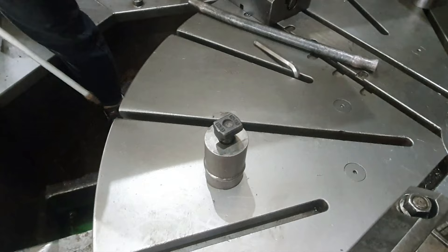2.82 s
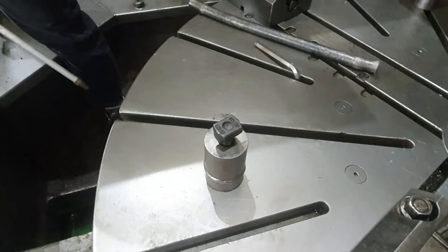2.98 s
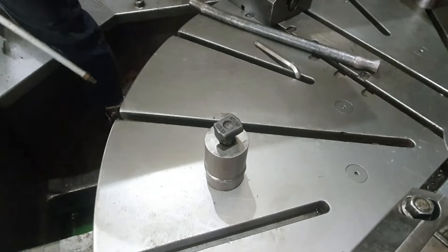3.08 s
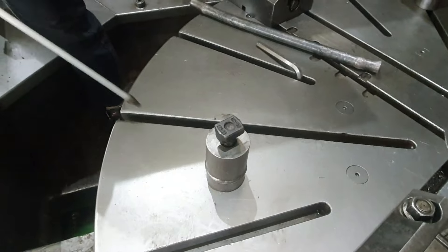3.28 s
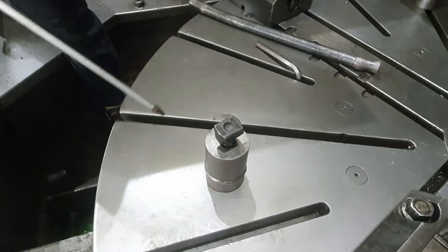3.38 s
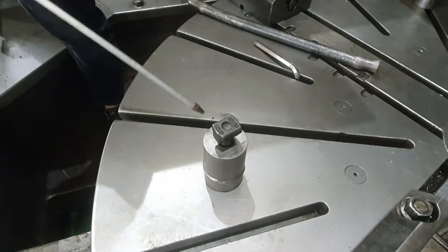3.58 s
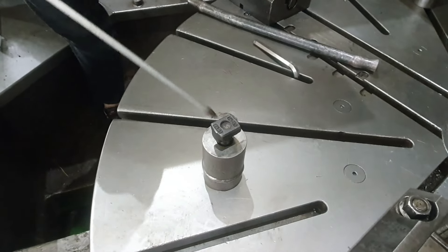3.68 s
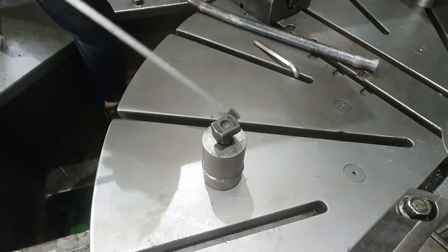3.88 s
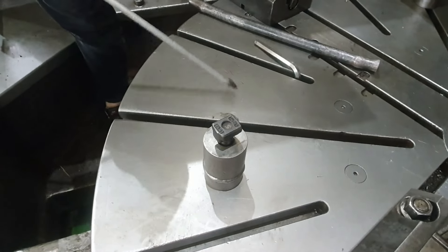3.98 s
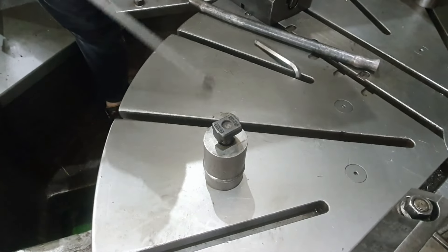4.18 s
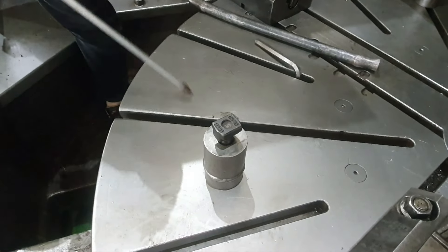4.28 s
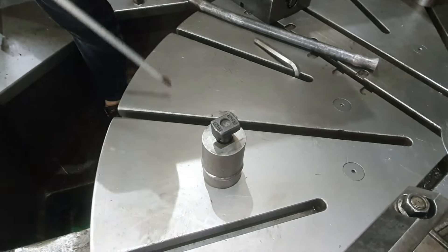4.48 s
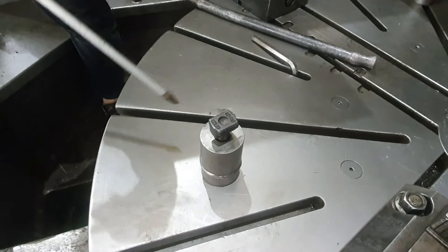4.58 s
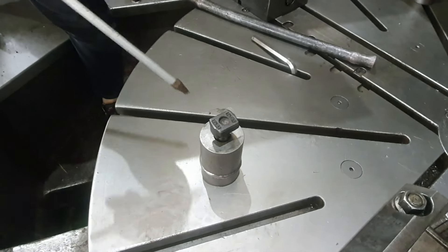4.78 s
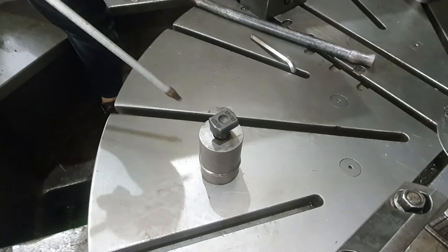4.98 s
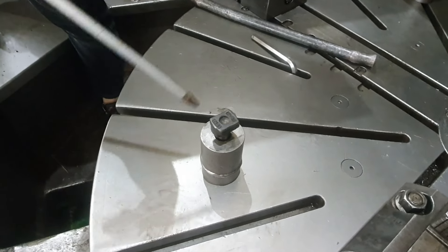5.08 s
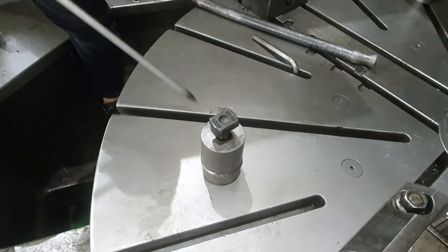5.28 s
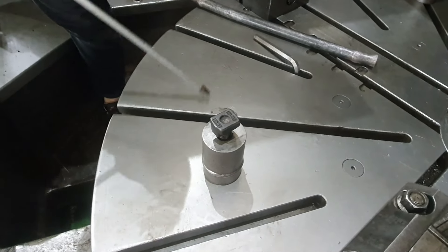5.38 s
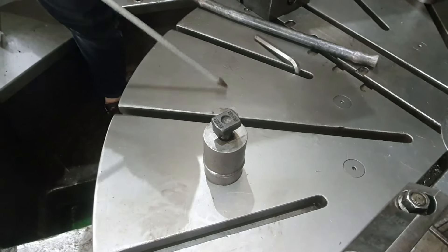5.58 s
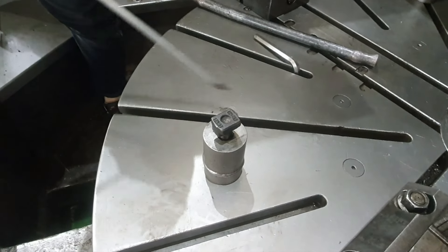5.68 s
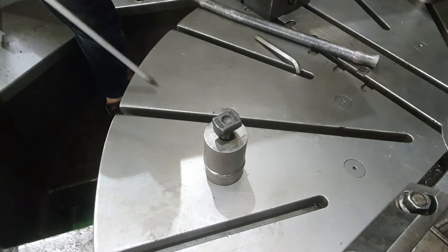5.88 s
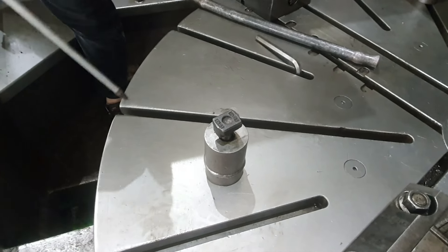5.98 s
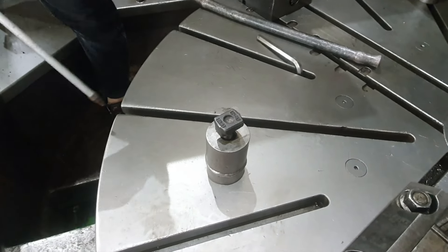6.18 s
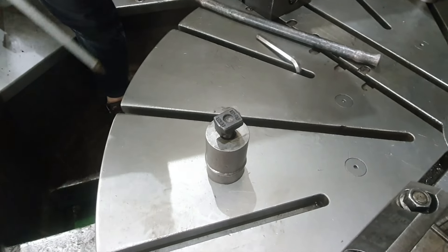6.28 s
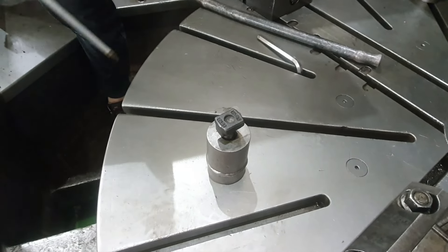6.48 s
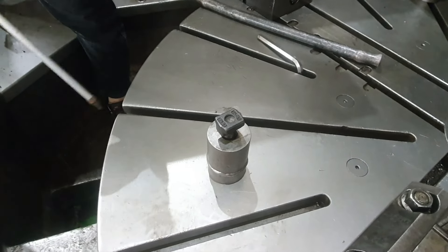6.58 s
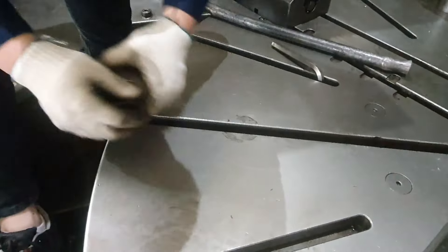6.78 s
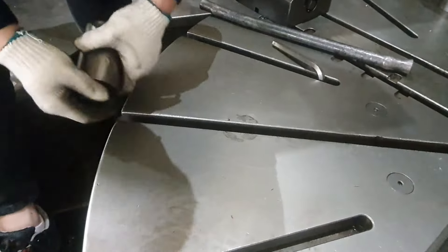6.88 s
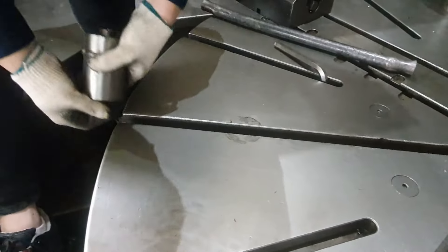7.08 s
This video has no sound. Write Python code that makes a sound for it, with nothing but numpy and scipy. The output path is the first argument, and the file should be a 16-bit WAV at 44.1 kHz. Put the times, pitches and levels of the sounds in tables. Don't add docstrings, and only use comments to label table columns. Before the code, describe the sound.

Close stereo microphone in a reverberant machine shop. The fading ring of an earlier metal knock sits over a quiet beating hum and irregular low air buffets. Two sharp clinks and a heavier clang follow, with quick rocking chatter and scraping on a metal table. Then a fierce air jet blasts steadily, with quick breathy hollow tones and splashy bursts, ending abruptly with a dull hall tail.

```python
import sys
import numpy as np
from scipy import signal
from scipy.fft import rfft, irfft, next_fast_len
from scipy.io import wavfile
from scipy.ndimage import uniform_filter1d, map_coordinates

SR = 44100
rng = np.random.default_rng(int(sys.argv[2]) if len(sys.argv) > 2 else 0)


def output_pcm(signal):
    pcm = np.clip(np.atleast_2d(signal).T, -1, 1) * 32767
    wavfile.write(sys.argv[1], SR, np.round(pcm).astype(np.int16))


def voltage_ratio(level):
    return 10 ** (np.asarray(level, float) / 20)


N = 314874

# middle in seconds, half length in seconds, level in dB.
GUSTS = [(0.21, 0.19, -49.5), (0.62, 0.17, -46), (0.77, 0.037, -41), (1.02, 0.1, -41), (1.19, 0.23, -45.5),
         (1.59, 0.15, -39.5), (1.73, 0.056, -44), (2.04, 0.19, -51), (2.38, 0.073, -38.5),
         (2.55, 0.091, -44.5), (2.7, 0.067, -41), (2.82, 0.038, -49.5), (2.96, 0.05, -45),
         (3.22, 0.023, -50), (3.37, 0.063, -40.5), (3.55, 0.019, -51), (3.67, 0.038, -53.5),
         (3.83, .03, -70), (3.92, 0.014, -53), (4.1, 0.088, -57), (4.24, 0.028, -62), (4.48, 0.12, -49),
         (4.72, 0.072, -40), (4.87, 0.032, -47), (4.99, 0.056, -41.5), (5.12, 0.026, -36.5),
         (5.22, 0.033, -49), (5.49, 0.048, -58), (5.73, 0.3, -60.5), (6.04, 0.12, -44.5), (6.23, 0.11, -48),
         (6.44, 0.025, -39.5), (6.63, 0.14, -44), (6.88, 0.22, -57.5)]
# frequency in Hz, level in dB per Hz.
SCRAPE_COLOUR = [(1000, 3.5), (3000, 2), (4600, -9), (5300, -38), (7600, -52), (8600, -1), (10300, -3),
                 (15700, -8)]
BAR_HZ = [570.6, 1502, 1410, 2799, 2826, 2982, 4452, 4484, 6277, 6368, 8371, 8290, 8815, 8899]
COLLAR_HZ = [9981, 10075, 10290, 10495, 10654, 11045, 11466, 12118, 12148, 12922, 13620, 14379, 15335,
             15590]
SLEEVE_HZ = [10772, 14450, 14783, 15116, 15450]
DROPS_S = [
    1.474,
    1.555,
    1.7177,
]
# frequency in Hz, level in dB per Hz.
NOZZLE_COLOUR = [(3060, -21), (5200, -17), (6990, -18), (8450, -9), (11400, -3), (15400, -1.5)]

REST_S = 1.938
SHUT_S = 6.84


def unit(x):
    return x / np.sqrt(np.mean(x ** 2) + 1e-20)


def along(points, hz):
    f, v = np.transpose(points)
    return np.interp(np.log(hz + 1), np.log(f + 1), v)


def curves(rows):
    s, *cols = np.transpose(rows)
    return [np.interp(np.arange(N) / SR, s, c) for c in cols]


def ramp(start_s, lasting_s):
    return np.clip((np.arange(N) / SR - start_s) / lasting_s, 0, 1)


def swells(rows, floor_db, order=2):
    t = np.arange(0, N + 128, 128) / SR
    power = voltage_ratio(2 * floor_db)
    for row in rows:
        power = power + voltage_ratio(2 * row[order] - 12 * ((t - row[0]) / abs(row[1])) ** 2)
    return np.interp(np.arange(N) / SR, t, 10 * np.log10(power))


def wobble(rate):
    knots = rng.standard_normal(int(N * rate / SR) + 4)
    return map_coordinates(knots, [np.arange(N) * rate / SR])


def jitter(count, rate, seconds):
    at = np.arange(round(seconds * SR)) * rate / SR
    knots = rng.standard_normal((count, int(seconds * rate) + 2))
    return np.array([np.interp(at, np.arange(len(k)), k) for k in knots])


def filtered(x, response):
    m = next_fast_len(N + SR // 4)
    return irfft(rfft(x, m) * response(np.fft.rfftfreq(m, 1 / SR)), m)[..., :N]


def shape(points):
    return lambda hz: voltage_ratio(along(points, hz)) * np.minimum(hz / points[0][0], 1) ** 4


def rush(gain, alike, patchy_db, swinging=False):
    # time in seconds, lateness at the left port in microseconds.
    bearing = [(3.1, -165), (3.35, -110), (3.6, -43), (3.9, 23), (4.2, -15), (4.45, -82), (4.7, -65),
               (5.05, -42), (5.3, 14), (5.6, 17), (5.85, -66), (6.05, -140), (6.3, -160), (6.7, -180),
               (7, -68)]
    bins, t, z = signal.stft(rng.standard_normal((3, N)), SR, nperseg=512)
    field = uniform_filter1d(rng.standard_normal(z.shape[1:]), size=7, axis=0)
    field = uniform_filter1d(field, size=8, axis=1)
    if swinging:
        late_us = np.interp(t, *np.transpose(bearing))
        z = np.append(z, [z[0] * np.exp(-2e-6j * np.pi * bins[:, None] * late_us)], axis=0)
    m = next_fast_len(N)
    noise = rfft(signal.istft(z * voltage_ratio(patchy_db * unit(field)), nperseg=512)[1][:, :N], m)
    hz = np.fft.rfftfreq(m, 1 / SR)
    like = np.clip(along(alike, hz), -1, 1)
    shared, own = np.sqrt(abs(like)), np.sqrt(1 - abs(like))
    late = np.sign(like) * noise[3 if swinging else 0]
    left = shared * late + own * noise[1]
    right = shared * noise[0] + own * noise[2]
    return unit(irfft(gain(hz) * [left, right], m)[:, :N])


def shop():
    # frequency in Hz, level in dB per Hz.
    hall_colour = [(71, -46.5), (120, -25.5), (200, -8), (260, -6.5), (384, -16), (543, -11.5), (722, -16),
                   (1110, -18), (1440, -22), (2080, -18.5), (2770, -26), (3920, -29), (4340, -32.5),
                   (15700, -60)]
    # frequency in Hz, left-right likeness from -1 to 1.
    port_likeness = [(60, -0.075), (150, 0.82), (380, 0.79), (950, -0.055), (2380, -0.09), (5980, -0.3),
                     (15000, 0.6)]
    # frequency in Hz, level in dB, beat in Hz, the neighbour's share.
    pump_lines = [(269.2, -43, 14, .6), (538.3, -47, 2.7, .95), (807.5, -58, 2.7, .7),
                  (1077, -56, 1.3, .15), (1879, -64, 1, .2)]
    t = np.arange(N) / SR
    hum = np.zeros((2, N))
    for hz, db, beat_hz, share in pump_lines:
        turn = 2 * np.pi * hz * t + 0.57 * wobble(8.2) + 0.5 * jitter(2, 2.3, N / SR)
        pair = np.sin(turn) + share * np.sin(turn - 2 * np.pi * beat_hz * (t - 0.28))
        hum += voltage_ratio(db + 4.5 + 0.73 * wobble(5.5)) * pair
    hall = voltage_ratio(-35.5 + 0.42 * wobble(2.88)) * rush(shape(hall_colour), port_likeness, patchy_db=2.07)
    return hum + hall


def earlier():
    # frequency in Hz, level in dB, t60 in seconds before stretching 4.9-fold (at
    # most 1.3 s).
    old_modes = [(1520, -7, 0.4), (2200, -10, 5.0), (2770, 0, 0.68), (2870, -4, .6), (4520, -10, 0.3),
                 (8830, -15, 0.69), (10000, -8, 0.24), (11050, -19, 0.38), (12110, -34, 1.0)]
    out, t = np.zeros((2, N)), np.arange(SR) / SR
    for hz, db, t60_s in old_modes:
        smear = 3.2 * jitter(2, 120, 1) * (3000 / hz) ** 0.5
        level_db = db - 38.5 - 60 * t / min(t60_s * 4.9, 1.3) + 3.0 * jitter(2, 90, 1)
        out[:, :SR] += voltage_ratio(level_db) * np.sin(2 * np.pi * hz * t + smear)
    rasp = rush(shape(SCRAPE_COLOUR), [(1000, 0.18)], patchy_db=-5.0)
    out[:, :SR] += voltage_ratio(-48.0 - 60 * t / 0.8) * rasp[:, :SR]
    return out


def buffet():
    # frequency in Hz, level in dB per Hz.
    rumble_colour = [(20, -11), (40, -8), (55, 2.5), (100, -3), (200, -4.5), (400, -11), (800, -73)]
    lumps = voltage_ratio(1.2 * np.array([wobble(14), wobble(14)]))
    rumble = unit(lumps * rush(shape(rumble_colour), [(50, 0.21)], patchy_db=1.5))
    return voltage_ratio(swells(GUSTS, -86) + 2.5) * rumble


def pops():
    # time in seconds, left pressure, right pressure (full scale 1).
    pushes = [(0.563, 0.0041, -0.039), (.752, -0.019, -0.047), (0.786, 0.022, 0.064), (0.981, 0.02, 0.079),
              (1.03, -.03, 0.04), (1.061, 0.011, -0.029), (1.087, 0.046, 0.0052), (1.12, 0.021, -0.039),
              (1.447, -0.018, 0.021), (1.6, -0.024, 0.021), (1.703, 0.011, -.04), (2.31, 0.021, 0.044),
              (2.343, -0.046, 0.046), (2.381, 0.037, 0.052), (2.407, -0.015, -.03), (2.483, -0.01, -0.039),
              (2.515, 0.019, -0.056), (2.649, -0.023, -0.032), (2.675, .065, 0.047), (2.821, -0.013, -.02),
              (3.321, -.03, 0.016), (4.985, 0.022, -0.036), (5.018, 0.025, 0.024), (5.116, -0.01, 0.045),
              (6.455, 0.035, -0.036), (6.629, -0.036, 0)]
    half_width_s = 0.003
    out, u = np.zeros((2, N)), np.arange(-1000, 1000) / SR / half_width_s
    lobe = (1 - u * u) * np.exp(-u * u / 2)
    for s, left, right in pushes:
        out[:, round(s * SR) - 1000:][:, :len(u)] += np.outer([left, right], lobe)
    return out


def walls(x):
    # frequency in Hz, t60 in seconds.
    hall_t60 = [(200, 1.4), (2000, 0.68), (6000, 1.52), (15000, 0.077)]
    hz, t, z = signal.stft(rng.standard_normal((2, SR)), SR, nperseg=256)
    decay = voltage_ratio(-60 * t / along(hall_t60, hz)[:, None])
    tail = signal.istft(z * decay, SR, nperseg=256)[1]
    late = np.pad(x, ((0, 0), (400, 0)))
    return signal.fftconvolve(late, tail / np.linalg.norm(tail[0]), axes=1)[:, :N]


def knocks():
    # start in seconds, crack in dB, thud in Hz, thud in dB, scrape in dB.
    contacts = [
        (1.4748, -16.5, 608, -29, -25.5),
        (1.484, -26, 690, -31.5, -21.5),
        (1.556, -23, 1030, -23.5, -21.5),
        (1.568, -36, 800, -38, -38),
        (1.679, -47.5, 493, -46, -36.5),
        (1.7186, -13.5, 334, -30.5, -28),
        (1.774, -26, 513, -46, -32),
        (1.783, -16, 604, -38, -23.5),
        (1.89, -50, 594, -52, -23),
    ]
    # frequency in Hz, level in dB per Hz.
    crack_colour = [(300, -1), (900, 3), (1500, 9), (3000, 6), (4700, 2), (5600, -22), (7200, -45),
                    (9000, -25), (13000, -16.5), (15700, -16)]
    out, t = np.zeros((2, N)), np.arange(SR // 2) / SR
    rise = np.minimum(t / 0.0015, 1)

    def through_bar(f):
        peaks = sum(1 / (1 + ((f - hz) / 60) ** 2) for hz in BAR_HZ + COLLAR_HZ + SLEEVE_HZ)
        return shape(SCRAPE_COLOUR)(f) * (0.46 + peaks)

    grit = rush(shape(crack_colour), [(1000, 0.57), (9000, 0.36)], patchy_db=1.5)
    rasp = rush(through_bar, [(1000, 0.45), (9000, 0.19)], patchy_db=-1.0)
    for s, crack_db, thud_hz, thud_db, scrape_db in contacts:
        scrape_t60_s = 0.12 + 0.49 * (s - contacts[0][0])
        here = slice(round(s * SR), round(s * SR) + len(t))
        thud = np.sin(2 * np.pi * thud_hz * t) * (1 + 0.5 * np.sin(2 * np.pi * 0.205 * thud_hz * t))
        out[:, here] += rise * voltage_ratio(crack_db - 60 * t / 0.024) * grit[:, here]
        out[:, here] += rise * voltage_ratio(scrape_db - 60 * t / scrape_t60_s) * rasp[:, here]
        out[:, here] += rise * voltage_ratio(thud_db - 60 * t * thud_hz / 70) * thud
    return out


def contact_rings(t, hz, level_db, t60_s):
    # start in seconds, blow in dB, then the push in dB on the bends
    # under 2 kHz, near 2.8 kHz and near 4.5 kHz.
    hits = [(1.474, -14, 5, 14, 1.5), (1.483, -15.5, 10.5, 5, 4), (1.493, -11.5, -3, 11.5, -10),
            (1.51, -18.5, -12, 10.5, -8), (1.556, -15, 10, 8, -10), (1.562, -29, -6, -4, -10),
            (1.568, -19, -6, 5, -2), (1.592, -21, 9.5, -8, 4), (1.659, -27.5, 10, -7, -12),
            (1.692, -18, 0, 7, -10), (1.7214, 1.5, 2, 0.5, -17), (1.734, -0.5, 0, 0, -18),
            (1.749, -2, 1, 5.5, -20), (1.768, -4, 3.5, -12, -4), (1.787, -0.5, -5, -6, 4.5),
            (1.803, -6.5, 12, -1, 10), (1.824, -5.5, 9, -3, 14), (1.846, -8, 10, -4, 18),
            (1.873, -10, 13.5, -5, 15), (1.897, -3, 7, -10, -18)]
    ninth_push_db = [8, 10.5, 7, 8.5, -1, 0, -5, -7, -4, -1, -6, -3, -1, 0, 0, 5, -2, 0, 5, 1]
    grip_db = [-0.5, -5, -3, 1, 0, -11, -16, -1, 0, -3, -6, -18, -6, 3.5, -1, 2, -12, -5, 14, 8, -3, 3, 0,
               -13, -3, -5, 2, -1, 3, -4, -13, 10, 1]
    size = np.zeros((len(hz), len(t)))
    luck = rng.standard_normal((len(hits), len(hz), 1))
    frees = []
    for hit in hits:
        drop_s = max(s for s in DROPS_S if s < hit[0] + 0.005)
        frees.append(min(0.21 + 5.3 * (hit[0] - drop_s), 1))
    rises = [0.0016 + 0.011 * free ** 4 for free in frees]
    ends = [(hit[0] + rise, rise) for hit, rise in zip(hits[1:], rises[1:])] + [(REST_S + 0.041, 0.05)]
    for hit, ninth_db, free, rise, (end, over), chance in zip(hits, ninth_push_db, frees, rises, ends, luck):
        s, db, low_db, mid_db, high_db = hit
        bands = [hz < 2000, hz < 3500, hz < 4700, abs(hz - 8600) < 500]
        push_db = np.select(bands, [low_db, mid_db, high_db, ninth_db], 0)
        push_db = push_db + (s < DROPS_S[-1]) * np.array(grip_db)[:, None]
        window = np.clip((t - s) / rise, 0, 1) * np.clip((end - t) / over, 0, 1)
        live = np.flatnonzero(window)
        start_db = db + level_db + push_db + 1.3 * chance * (hz / 10000)
        size[:, live] += window[live] * voltage_ratio(start_db - 60 * (t[live] - s) / (t60_s * free))
    return size


def port_lead(t, count):
    lead_held = [-.3, .8, .4, -.9, .4, -1.2, -1.1, -2.4, .1, 2.6, -2.7, -1.8, .8, -.4, 1.4, 2.9, 2.7, -1.3,
                 .7, -2, -2, 1.9, 2.4, .2, -1.7, .4, -.8, -1.4, 1.4, 0, .6, .1, -.6]
    lead_down = [-.2, -2.4, .3, -1, -.5, -.8, -2.8, 1.2, -1.5, -1.6, 2.4, 2.3, 2.5, -2.4, 2, -1, .1, .2,
                 -1.2, -2.1, -1.2, -2.5, -2.4, -1.6, -2, -.9, -.2, -2.8, 1.7, -2.5, .5, 2.8, -1.6]
    held = t < DROPS_S[-1]
    lead = np.where(held, np.array(lead_held)[:, None], np.array(lead_down)[:, None])
    sway = np.where(held, 0.9, 0.25 * np.clip((REST_S + 0.1 - t) / 0.1, 0, 1))
    return lead + sway * jitter(count, 25, 1.6)


def bar():
    # level in dB, t60 in seconds, lingering level in dB.
    bar_modes = [(-27, 2.4, -37), (-6, 0.47, -18), (-39, 0.25, -21), (-19, 0.31, -16.5), (-13, 0.33, -17),
                 (-25, 0.27, -20), (-19, 0.97, -8), (-16.5, 1.2, -16), (-24, 0.16, -31), (-24, 0.3, -37),
                 (-26, 0.52, -24), (-25, 0.61, -26), (-21.5, 0.82, -30), (-23, 0.85, -20)]
    # level in dB, t60 in seconds.
    collar_sleeve_modes = [(-29, 0.35), (-23, 0.5), (-32, 0.31), (-30.5, 0.68), (-42, .4), (-28, 0.66), (-28, .5),
                           (-25, .4), (-19, 0.37), (-17, 0.47), (-32, .4), (-31, .3), (-36, .3), (-37, .3),
                           (-34, .4), (-22, .3), (-39, .4), (-49, .3), (-35, .4)]
    # frequency in Hz, t60 in seconds.
    linger_t60 = [(575, 1.1), (1505, 3.6), (2800, 2.4), (4450, 2.95), (10000, 0.5)]
    start_s = DROPS_S[0]
    t = start_s + np.arange(round(1.6 * SR)) / SR
    high_modes = [(*mode, -18) for mode in collar_sleeve_modes]
    level_db, t60_s, linger_db = np.transpose(bar_modes + high_modes)[:, :, None]
    hz = np.array(BAR_HZ + COLLAR_HZ + SLEEVE_HZ)[:, None]
    count = len(hz)
    since = np.clip(t - DROPS_S[-1], 0, None)
    size = voltage_ratio(level_db + linger_db - 60 * since / along(linger_t60, hz))
    size *= np.clip(since / 0.023, 0, 1) * voltage_ratio(1.2 * jitter(count, 21.0, 1.6))
    near = SR * 2 // 3
    size[:, :near] += contact_rings(t[:near], hz, level_db, t60_s)
    rough = (hz / 10000) ** 0.61 * np.clip(1.3 - 3 * since, 0.25, 1)
    size *= voltage_ratio(1.1 * rough * jitter(count, 150, 1.6))
    angle = 2 * np.pi * hz * t + rng.uniform(0, 2 * np.pi, hz.shape)
    angle = angle + 1.38 * rough * jitter(count, 90, 1.6)
    lead = port_lead(t, count)
    left = np.sum(size * np.sin(angle + lead / 2), axis=0)
    right = np.sum(size * np.sin(angle - lead / 2), axis=0)
    out = np.zeros((2, N))
    out[:, round(start_s * SR):][:, :len(t)] = [left, right]
    return out


def leak():
    # time in seconds, level in dB.
    leak_db = [(0, -60), (1.24, -54.5), (1.31, -45.5), (1.42, -49), (1.5, -62), (2.84, -71), (2.9, -50),
               (3.01, -53), (3.05, -75)]
    hiss = voltage_ratio(curves(leak_db)[0]) * rush(shape(NOZZLE_COLOUR), [(5000, 0.1)], patchy_db=3.5)
    handle = shape([(750, -14), (900, -3), (1100, -4), (1500, -50)])
    whisper_db = swells([(2.99, 0.022, -44)], -99)
    return hiss + voltage_ratio(whisper_db) * rush(handle, [(900, 0.93)], patchy_db=0)


def deflected_air(splash_db, sharp, fade_db, held):
    # frequency in Hz, level in dB per Hz.
    roar_colour = [(205, -15), (270, -4.5), (350, -7.5), (560, -3), (800, -6.5), (1200, -17)]
    # middle in seconds, half length in seconds, level in dB.
    puffs = [
        (3.37, 0.046, -30),
        (4.12, 0.071, -37),
        (4.48, 0.019, -37),
        (4.99, 0.059, -37),
        (5.11, 0.051, -38.5),
        (5.39, 0.018, -39),
        (6.25, .08, -42),
    ]
    gust_db = np.maximum(swells(GUSTS, -76) + 50, -25)[held]
    gain = np.hypot(voltage_ratio(-39.5 + 0.4 * splash_db + 0.097 * gust_db), voltage_ratio(swells(puffs, -80)))
    level_db = -7.5 * (sharp - 0.84) + 0.9 * fade_db + 1.9 * wobble(11.0)
    return gain * voltage_ratio(level_db) * rush(shape(roar_colour), [(200, 0.09), (700, 0.29)], patchy_db=2.0)


def slot_tone(slot_db, fade_db):
    # frequency in Hz, width in Hz, level in dB.
    resonances = [(1350, 70, 1), (1460, 90, 3)]
    # frequency in Hz, level in dB per Hz.
    wash_colour = [(500, -60), (800, -12), (1100, -11), (2000, -10), (3000, -17), (5000, -29)]

    def neck(f):
        ring = abs(sum(voltage_ratio(db) * f * w / (c * c - f * f + 1j * f * w) for c, w, db in resonances))
        return shape(wash_colour)(f) + ring * np.minimum(f / 1100, 1) ** 3

    level_db = slot_db + 0.89 * fade_db + 2.5 + 1.2 * wobble(60)
    likeness = [(700, 1.0), (1400, 0.33), (2200, 0.29)]
    return voltage_ratio(level_db) * rush(neck, likeness, patchy_db=1.6, swinging=True)


def edge_splash(edge_db, sharp, fade_db, flutter):
    # frequency in Hz, level in dB per Hz.
    splash_colour = [(1200, -31), (1900, 1), (2400, -2.5), (3600, -0.5), (5000, -5), (6200, -20),
                     (8000, -47)]
    # frequency in Hz, level in dB.
    sharp_colour = [(1500, -16), (2600, -4), (3300, -17), (4100, -1.5), (5200, 2), (6500, 19), (9000, 5)]
    level_db = edge_db + 0.82 * fade_db + 2.0 + 1.0 * flutter + 1.18 * wobble(90)
    likeness = [(2000, 0.29), (3500, 0.53), (5500, 0.28)]
    edge = voltage_ratio(level_db) * rush(shape(splash_colour), likeness, patchy_db=2.0, swinging=True)
    bright = filtered(edge, lambda hz: voltage_ratio(along(sharp_colour, hz)))
    return (1 - sharp) * edge + sharp * bright


def nozzle_hiss(splash_db, fade_db, flutter):
    # time in seconds, level in dB.
    nearness_db = [(3.03, -21.5), (3.1, -20.5), (3.4, -21.5), (3.45, -17), (3.495, -27), (3.53, -20.5),
                   (3.89, -20.5), (3.94, -23), (3.98, -21), (4.58, -20), (4.66, -19), (4.77, -20),
                   (5.2, -18.5), (5.32, -24), (5.37, -22), (5.95, -20.5), (6.2, -19), (6.84, -19.5)]
    level_db = 5.5 + 0.18 * splash_db + 1.34 * wobble(9) + curves(nearness_db)[0]
    level_db = level_db + fade_db + 1.53 * flutter + 0.18 * wobble(22)
    likeness = [(5000, 0.13), (9000, 0.28), (15000, 0.23)]
    hiss = voltage_ratio(level_db) * rush(shape(NOZZLE_COLOUR), likeness, patchy_db=1.7, swinging=True)
    shut = ramp(6.88, 0.13)
    return (1 - shut) * hiss + shut * filtered(hiss, shape([(6000, 8.0), (12000, -8.0), (15500, -23)]))


def gun():
    # middle in seconds, half length in seconds, slot tone in dB, splash in dB.
    passes = [(3.025, 0.022, -33, -30), (3.075, 0.062, -28.5, -33), (3.177, 0.075, -42, -26.5),
              (3.23, .03, -42, -44), (3.288, 0.034, -27.5, -32.5), (3.365, 0.05, -37, -35),
              (3.435, 0.027, -32, -29), (3.566, 0.025, -31, -31), (3.631, 0.024, -33, -29),
              (3.712, 0.057, -37, -34.5), (3.805, 0.017, -29.5, -30), (3.895, 0.029, -33, -31.5),
              (3.969, 0.029, -33, -32), (4.085, 0.022, -37, -49), (4.14, 0.025, -28.5, -31),
              (4.291, 0.029, -29.5, -28.5), (4.48, 0.029, -32.5, -26.5), (4.535, 0.017, -37, -35),
              (4.585, 0.017, -30.5, -36), (4.669, 0.03, -36.5, -22.5), (4.734, 0.083, -35.5, -25),
              (4.834, 0.017, -35.5, -26.5), (4.94, 0.02, -34, -26), (5.0, 0.021, -36, -25),
              (5.055, 0.024, -34.5, -40), (5.11, 0.015, -37, -23.5), (5.155, 0.018, -34, -26.5),
              (5.212, 0.018, -27.5, -38), (5.379, 0.038, -28.5, -29.5), (5.51, 0.042, -38, -34),
              (5.572, 0.025, -31, -31.5), (5.709, 0.04, -30, -33), (5.885, 0.026, -27, -26.5),
              (6.055, 0.041, -32.5, -29.5), (6.188, 0.011, -29, -25.5), (6.24, 0.043, -43, -32.5),
              (6.31, 0.021, -31, -26.5), (6.39, 0.078, -37, -28), (6.469, 0.023, -27.5, -45),
              (6.558, 0.072, -44, -26.5), (6.66, 0.088, -39.5, -34.5), (6.8, 0.085, -36, -24)]
    # time in seconds, share of splash from sharp edges from 0 to 1.
    aim = [(3, 0.46), (4.5, 0.68), (4.65, 0.12), (5.2, 0.07), (5.5, 0.52), (5.9, 0.52), (6.2, 0.64),
           (6.8, 0.57), (7.14, 0.14)]
    open_s, closing_s, closing_db, fade_db_per_s = 3.0135, 0.079, -20, 53
    flutter = wobble(30)
    fade_db = closing_db * ramp(SHUT_S, closing_s) - fade_db_per_s * ramp(SHUT_S + closing_s, 1)
    held = np.minimum(np.arange(N), round(SHUT_S * SR))
    slot_db = swells(passes, -45)[held]
    edge_db = swells(passes, -39.5, order=3)[held]
    splash_db = edge_db - np.median(edge_db[N // 2:])
    sharp = np.clip(curves(aim)[0], 0, 1)
    jet = nozzle_hiss(splash_db, fade_db, flutter) + edge_splash(edge_db, sharp, fade_db, flutter)
    jet = jet + slot_tone(slot_db, fade_db) + deflected_air(splash_db, sharp, fade_db, held)
    return ramp(open_s, 0.0012) * jet + leak()


def scene():
    # start in seconds, duration in seconds, change in dB.
    gain_moves = [
        (1.099, 0.31, 5),
        (1.72, 0.2, -11),
        (2.95, 0.29, -3),
        (3.051, 0.63, -30),
        (4.3, .3, 5),
        (5.2, .2, 1),
        (5.8, 0.28, 10),
        (6.8, 0.28, 11.5),
    ]
    steel = voltage_ratio(-1) * bar() + knocks()
    gain_db = -2.5 + sum(db * ramp(s, lasting_s) for s, lasting_s, db in gain_moves)
    hall = steel + voltage_ratio(-14) * walls(steel) + earlier() + shop()
    return voltage_ratio(gain_db) * hall + gun() + buffet() + pops()


def low_pass(x):
    return signal.sosfilt(signal.butter(12, 16690, fs=SR, output="sos"), x)


def record(dry):
    hiss_colour = shape([(2500, 4), (6000, -9.0), (16000, -4)])
    x = dry + voltage_ratio(-58.5) * rush(hiss_colour, [(5000, 0.0047)], patchy_db=4.0)
    x = x / (1 + abs(x / 0.86) ** 8) ** (1 / 8)
    x = filtered(x, lambda hz: 1 / (1 + (hz / 15750) ** 300))
    return low_pass(x)


dry = scene()
out = record(dry)
output_pcm(out)
```